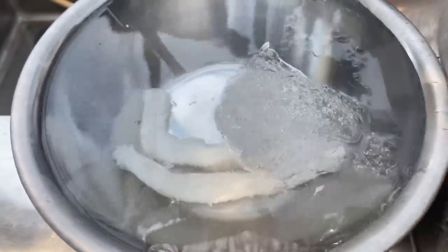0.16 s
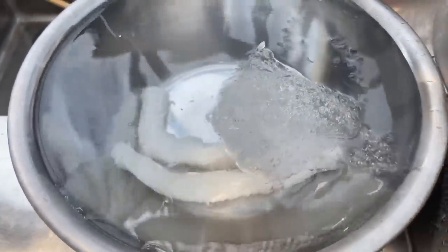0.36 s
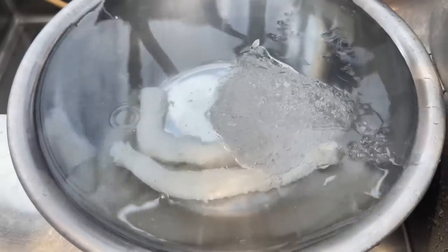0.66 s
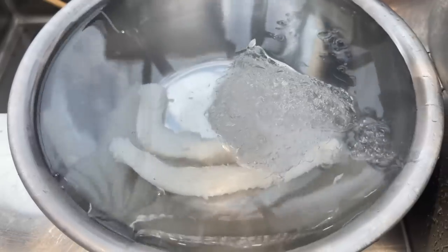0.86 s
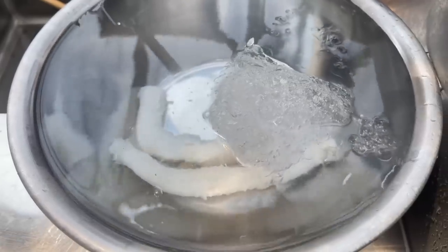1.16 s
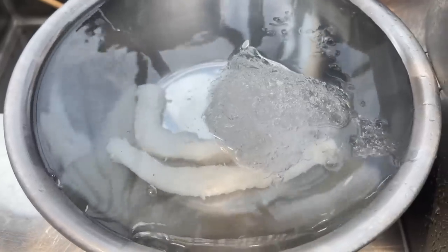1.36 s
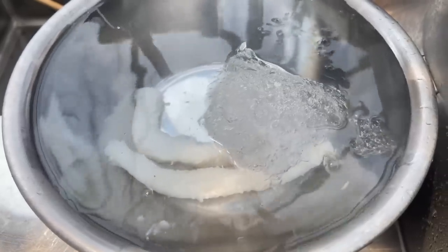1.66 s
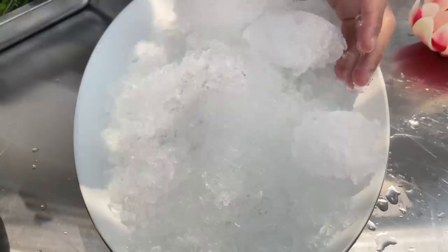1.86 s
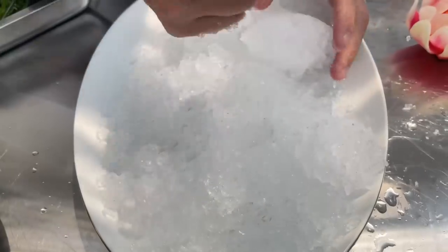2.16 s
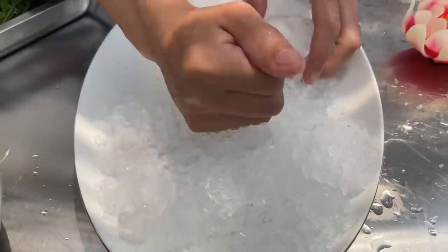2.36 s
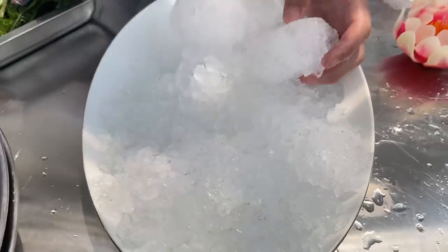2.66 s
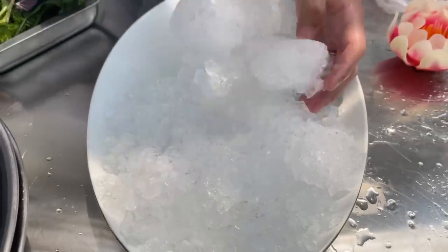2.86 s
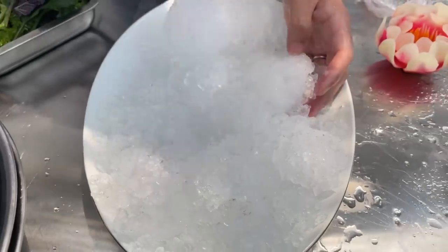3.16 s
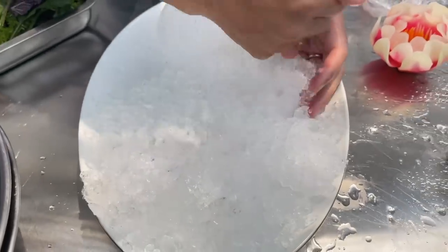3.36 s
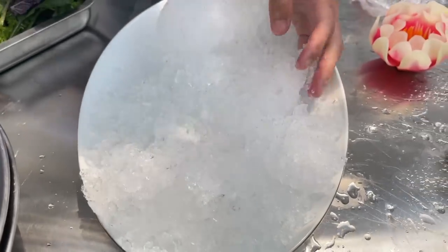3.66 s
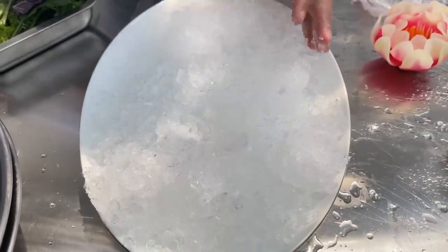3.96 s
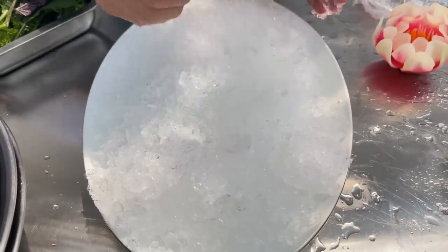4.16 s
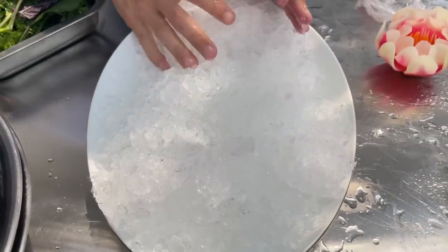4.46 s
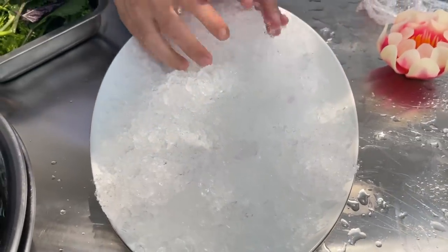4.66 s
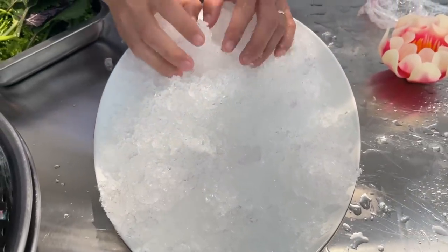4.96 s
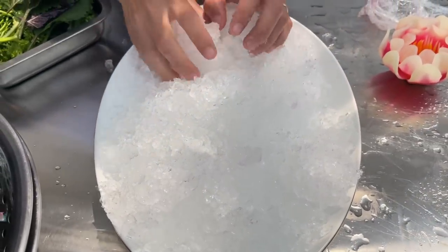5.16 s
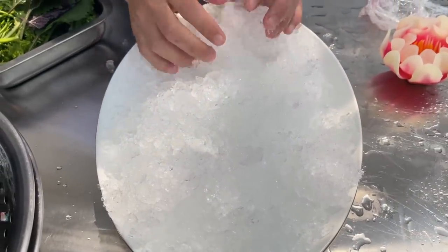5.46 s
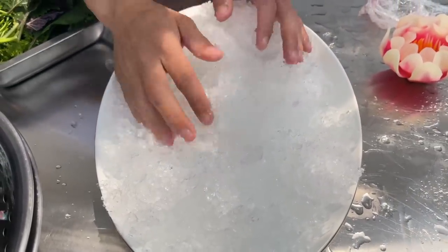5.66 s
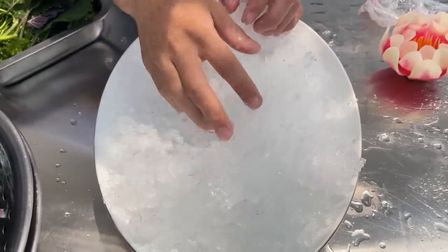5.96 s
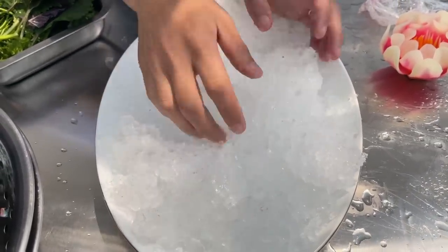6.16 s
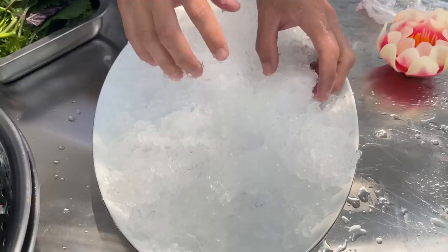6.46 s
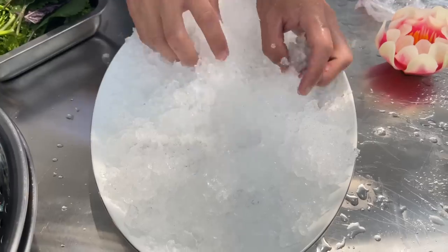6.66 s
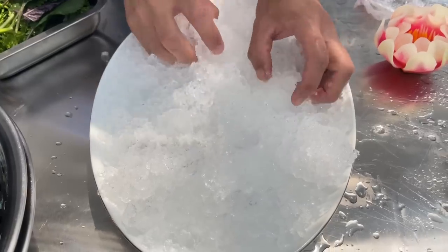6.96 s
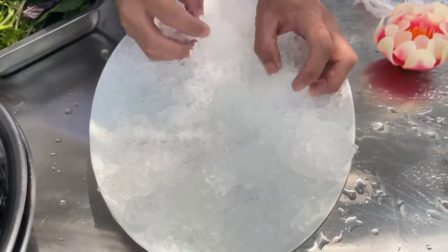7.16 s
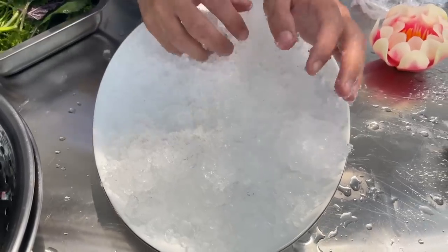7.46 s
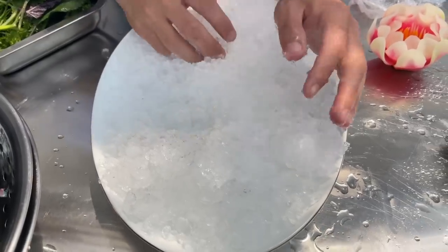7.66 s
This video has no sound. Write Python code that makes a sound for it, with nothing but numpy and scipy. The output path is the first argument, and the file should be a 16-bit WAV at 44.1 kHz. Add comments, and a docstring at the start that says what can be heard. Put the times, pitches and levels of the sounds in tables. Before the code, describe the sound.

After a quiet low water rush and a dull basin bump, crushed ice lands in crunchy bursts, then is pressed and spread with gritty crackles and clicks.

```python
"""Wet crushed ice on a steel counter

Handfuls of wet crushed ice land on a plate: bursts of tiny fractures, then a thud of the steel counter.
Fingers pat and spread the heap: grinding crystals, knocking lumps, snaps, clicks and a low hum of the push.
Dull bumps of basin and counter are filtered noise and pushes; water is a steady low rush of noise.
Faintly heard are puffs of hiss, thin wavering tones and a few far birds made of gliding, raspy tones.
A close pair of microphone ports hears it all."""
import sys
import numpy as np
from scipy import signal
from scipy.fft import rfft, irfft, next_fast_len
from scipy.io import wavfile
from scipy.ndimage import uniform_filter1d, map_coordinates

SR = 44100
rng = np.random.default_rng(int(sys.argv[2]) if len(sys.argv) > 2 else 0)


def transcribe(signal):
    """Save signal, clipped to [-1, 1], as a 16-bit WAV file at the path in sys.argv[1]."""
    frames = np.atleast_2d(signal).T
    limited = np.clip(frames, -1, 1)
    pcm = np.round(limited * 32767).astype(np.int16)
    wavfile.write(sys.argv[1], SR, pcm)


N = 344421  # length of the scene [samples]

# colour of the fine crystals' crackle: (frequency [Hz], level per Hz [dB])
FINE_SPECTRUM = [(1500, -11.5), (3000, -1), (4500, -5.5), (6500, -1.5), (8400, 6.5), (11200, 8),
                 (12200, -0.5), (13100, -16.5), (15600, -14)]


def amp(db):
    """Turn decibels into a plain factor."""
    return 10 ** (np.asarray(db) / 20)


def unit(x):
    """Scale a sound to an average (rms) strength of 1."""
    return x / np.sqrt(np.mean(x ** 2) + 1e-20)


def along(points, hz):
    """Read a curve of (frequency [Hz], value) points, with frequency on a log axis."""
    f, v = np.transpose(points)
    return np.interp(np.log(hz + 1), np.log(f + 1), v)


def seconds(size):
    """The time of each sample."""
    return np.arange(size) / SR


def wobble(rate, size=N):
    """A smooth random curve through `rate` random points a second."""
    points = rng.standard_normal(size // 40)
    return map_coordinates(points, [seconds(size) * rate], mode="mirror")


def filtered(x, response):
    """Change the strength and phase of each frequency by a (complex) response."""
    size = x.shape[-1]
    m = next_fast_len(size + SR // 10)  # spare room, so that endings do not wrap round
    hz = np.fft.rfftfreq(m, 1 / SR)
    return irfft(rfft(x, m) * response(hz), m)[..., :size]


def coloured(x, spectrum):
    """Shape a sound by a spectrum, then scale it to rms 1."""
    return unit(filtered(x, lambda hz: amp(along(spectrum, hz))))


def add(track, s, sound):
    """Mix a sound into the track from time s [s] on."""
    part = track[..., max(round(s * SR), 0):][..., :sound.shape[-1]]
    part += sound[..., :part.shape[-1]]


def swell(t, rise, t60, hold=0):
    """A smooth rise to 1, a hold, then a fall that takes t60 seconds to drop by 60 dB."""
    rising = np.sin(np.pi / 2 * np.minimum(t / rise, 1)) ** 2
    falling = amp(-60 * np.maximum(t - rise - hold, 0) / t60)
    return rising * falling


def grains(size, rate, spread_db):
    """Tiny fractures at random moments, on average `rate` a second, of unequal strength."""
    happens = rng.random(size) < rate / SR
    sign = rng.choice([-1, 1], size)
    strength = amp(spread_db * np.clip(rng.standard_normal(size), -2.5, 2.5))
    return happens * sign * strength


def echoes(x, t60s, size=SR // 2):
    """A diffuse tail of noise for each side; each frequency dies away at its own speed."""
    hz, t, z = signal.stft(rng.standard_normal((2, size)), SR, nperseg=256)
    fall = amp(-60 * t / along(t60s, hz)[:, None])
    tail = signal.istft(z * fall, SR, nperseg=256)[1]
    delayed = np.pad(x, (SR // 1000, 0))[None]  # the tail starts a millisecond late
    return signal.fftconvolve(delayed, tail / np.linalg.norm(tail[0]), axes=1)[:, :N]


def birds():
    """Far calls: tones whose pitch glides in an arch or a fall, made raspy by fast pitch flutter."""
    # (time [s], length [s], start [Hz], middle [Hz], end [Hz], flutter [share of pitch], level [dB])
    calls = [(0, .08, 2585, 2527, 2355, 0.123, -44), (3.447, 0.147, 3600, 3770, 3650, .065, -53.5),
             (5.933, 0.083, 3620, 3604, 3497, 0.02, -36), (6.113, 0.0806, 2150, 2695, 2510, 0.038, -35.5),
             (6.209, 0.096, 2480, 2318, 2060, 0.093, -39), (7.756, 0.11, 2750, 2720, 2700, 0.064, -43)]
    out, t = np.zeros(N), seconds(SR // 2)
    for s, length, start_hz, middle_hz, end_hz, rasp, db in calls:
        glide = np.interp(t / length, [0, .5, 1], [start_hz, middle_hz, end_hz])
        pitch = glide * (1 + rasp * wobble(700, len(t)))
        tone = np.sin(2 * np.pi * np.cumsum(pitch) / SR)
        add(out, s, amp(db) * swell(t, rise=0.0077, t60=0.33, hold=length - .03) * tone)
    return out


def rush():
    """A low rush of water: noise of slowly drifting level, nearly alike on both sides in the bass."""
    # (frequency [Hz], level per Hz [dB])
    rush_spectrum = [(22, -46), (35, 2.5), (55, -4.5), (110, 6), (160, 0), (250, -9.5), (500, -16),
                     (1000, -21), (2500, -31), (5000, -36.5), (8000, -43.5), (11500, -43), (13500, -84)]
    # (frequency [Hz], left-right likeness [1 = the same])
    likeness = [(100, 0.99), (300, 0.9), (700, 0.25), (5000, 0.14), (9000, 1)]

    def mid_and_side(hz):
        turn = np.arccos(np.clip(along(likeness, hz), -1, 1)) / 2
        return amp(along(rush_spectrum, hz)) * [np.cos(turn), np.sin(turn)]

    mid, side = filtered(rng.standard_normal((2, N)), mid_and_side)
    level = amp(-41.5 + 0.81 * wobble(3.14))
    return level * unit(np.array([mid + side, mid - side]))


def swishes():
    """Short soft puffs of hiss beside the basin: noise that swells and fades."""
    # (time [s], level [dB])
    puffs = [(0.201, -47.5), (.686, -45.5), (1.201, -48.5), (1.667, -48)]
    # (frequency [Hz], level per Hz [dB])
    hiss_spectrum = [(300, 4), (1700, 14), (3500, 11.5), (6000, 6), (8500, 5), (11200, 10.5), (12400, -4),
                     (13200, -42)]
    out, t = np.zeros(N), seconds(SR // 2)
    for s, db in puffs:
        hiss = coloured(rng.standard_normal(len(t)), hiss_spectrum)
        add(out, s, amp(db) * hiss * swell(t, rise=0.013, hold=0.074, t60=0.21))
    return out


def whine():
    """A few thin tones, slightly wavering in pitch and level, fade in and out together."""
    # (pitch [Hz], level [dB])
    thin_tones = [(1370, -64.5), (3170, -64.5), (3540, -64)]
    # (fade in starts [s], fade in ends [s], fade out starts [s], fade out ends [s])
    fade_times = (1.02, 1.13, 1.62, 1.85)
    tones = np.zeros(N)
    for hz, db in thin_tones:
        pitch = hz * (1 + 0.0112 * wobble(200))
        tones += amp(db + 1.4 * wobble(14.7)) * np.sin(2 * np.pi * np.cumsum(pitch) / SR)
    return tones * np.interp(seconds(N), fade_times, [0, 1, 1, 0])


def counter(force):
    """The steel counter answers a force by ringing at its own low pitches (modes)."""
    # (pitch [Hz], width [Hz], level [dB])
    modes = [(56, 21, 6), (77.2, 23.4, 7), (113, 33, 4.5), (142.6, 36, 3), (172.8, 15, 7), (238, 45, -3.5),
             (278.3, 27, 0.5), (359, 60, -8)]

    def response(f):
        total = 0
        for k, (pitch, width, db) in enumerate(modes):
            resonance = 1j * f * width / (pitch * pitch - f * f + 1j * f * width)
            total = total + (-1) ** k * amp(db) * resonance  # neighbours have opposite signs
        return total

    return filtered(force, response)


def contact(force, pitch_hz):
    """A springy contact passes mainly the band around its own pitch on to the counter."""
    width_hz = 0.55 * pitch_hz
    spring = lambda f: 1j * f / (pitch_hz ** 2 - f * f + 1j * f * width_hz)
    return unit(counter(filtered(force, spring)))


def blow(thud_db, knock_db, t60, thud_hz, hold=0):
    """A soft weight lands and settles: the counter thuds, with a short hollow knock on top."""
    # (frequency [Hz], level per Hz [dB])
    knock_spectrum = [(25, -40), (70, -13), (180, 5.5), (285, 1), (430, 1.5), (560, -4), (760, -4.5),
                      (950, -8.5), (1500, -17), (3000, -30), (10000, -84)]
    t = seconds(SR // 2)
    shape = swell(t, 0.0048, t60, hold)
    push = contact(t * np.exp(-t / 0.00022), thud_hz)
    settling = contact(shape * rng.standard_normal(len(t)), thud_hz)
    thud = unit(push + settling)
    knock = unit(shape * coloured(rng.standard_normal(len(t)), knock_spectrum))
    return (amp(thud_db) * thud + amp(knock_db) * knock) * np.sqrt(np.mean(shape ** 2))


def bumps():
    """Dull blows on basin and counter: a thud and a knock, with no crunch."""
    # (time [s], thud level [dB], thud pitch [Hz], knock level [dB])
    bump_list = [(1.228, -11, 194, -21.5), (1.281, -22, 82, -42), (1.371, -26.5, 109, -44),
                 (1.512, -20, 99, -46), (1.651, -28.5, 70, -44.5), (3.364, -23.5, 171, -39),
                 (4.51, -20, 93, -48), (5.94, -28, 144, -65), (6.473, -26.5, 160, -32.5),
                 (6.59, -20.5, 146, -28), (6.912, -24, 135, -42), (7.003, -43, 170, -25.5)]
    out = np.zeros(N)
    for s, thud_db, thud_hz, knock_db in bump_list:
        add(out, s, blow(thud_db, knock_db, 0.3, thud_hz))
    return out


def pressure():
    """How strongly each finger stroke drives crystals, lumps and push: it builds, holds and dies away."""
    # (time [s], length [s], fine crystals [dB], coarse lumps [dB], push on the plate [dB])
    strokes = [ (1.787, 0.13, -35, -46, -60), (2.055, 0.19, -34.5, -45, -51),
               (2.16, 0.2, -33.5, -39.5, -49.5), (2.474, 0.11, -38.5, -42.5, -48),
               (2.687, 0.076, -40.5, -52, -59), (2.776, 0.082, -32.5, -46.5, -71),
               (3.083, 0.043, -43.5, -44.5, -44.5), (3.552, 0.062, -47, -57, -50),
               (3.891, 0.061, -27.5, -30.5, -27), (3.985, 0.045, -36.5, -37, -38),
               (4.092, 0.066, -54, -53, -46), (4.249, 0.074, -33, -43, -44),
               (4.518, 0.1, -32.5, -36.5, -33), (4.677, 0.098, -35.5, -40, -40),
               (4.798, 0.088, -37.5, -44.5, -45.5), (4.93, 0.096, -42, -49, -53),
               (5.007, .14, -32.5, -40, -48.5), (5.177, .05, -37.5, -46.5, -55),
               (5.224, 0.066, -37.5, -43.5, -49.5), (5.317, 0.11, -35, -40, -46.5),
               (5.655, 0.03, -20.5, -31.5, -48), (5.724, 0.013, -24, -33.5, -38.5),
               (5.834, 0.076, -48, -55, -42), (5.898, 0.1, -25, -35, -39), (6.222, 0.095, -33, -42.5, -66),
               (6.381, 0.072, -36, -42.5, -43.5), (6.444, 0.063, -38, -45, -33.5),
               (6.485, 0.13, -28, -37, -31), (6.641, 0.15, -39, -45.5, -43.5),
               (6.769, 0.16, -32, -37.5, -38), (6.899, .07, -43.5, -42.5, -35.5),
               (6.981, 0.047, -36, -39, -26.5), (7.05, 0.22, -46.5, -51, -46.5),
               (7.247, 0.066, -40.5, -42.5, -36), (7.356, 0.12, -29.5, -49, -37),
               (7.439, 0.066, -38, -37, -34.5), (7.519, 0.061, -38.5, -42, -38.5),
               (7.603, 0.071, -35.5, -47, -53)]
    out, t = np.zeros((3, N)), seconds(SR)
    for s, length, *levels_db in strokes:
        rise = 0.59 * length  # the rest of the stroke holds
        shape = swell(t, rise, t60=0.3, hold=length - rise)
        add(out, s, np.outer(amp(levels_db), shape) ** 2)  # overlapping strokes add as power
    return np.sqrt(out)


def lumps(size, rate, pitch_hz):
    """Bigger pieces knock together: random fractures coloured around a pitch set by their size."""
    # (frequency [multiple of the lump pitch], level per Hz [dB])
    lump_spectrum = [(.15, -33), (.35, -15.5), (.6, 0.5), (1, 2), (1.45, 2.5), (2, -5.5), (3, -11),
                     (6, -20)]
    spectrum = [(multiple * pitch_hz, db) for multiple, db in lump_spectrum]
    return coloured(grains(size, rate, spread_db=2.5), spectrum)


def patchy(x, depth_db):
    """Ever-new pieces touch, so the colour shifts at random from moment to moment."""
    z = signal.stft(x, nperseg=512)[2]
    field = uniform_filter1d(rng.standard_normal(z.shape), size=5, axis=0)  # smooth over frequency
    field = uniform_filter1d(field, size=7, axis=1)  # smooth over time
    return unit(signal.istft(z * amp(depth_db * unit(field)), nperseg=512)[1][:len(x)])


def fingers():
    """Crystals grind in stick-slip clumps, lumps rub the plate or snap, and the push hums in the counter."""
    # a lump snapping: (frequency [Hz], level per Hz [dB])
    snap_spectrum = [(500, -18), (1200, 0.5), (3000, 1), (6000, -12), (11000, -17), (13500, -24)]
    # ice pushed over the plate: (frequency [Hz], level per Hz [dB])
    rub_spectrum = [(30, -45), (90, -2), (150, -1.5), (285, 3), (430, -0.5), (600, -7), (950, -6),
                    (1400, -10), (3000, -53), (10000, -80)]
    # (heap starts to grow [s], heap is full [s])
    heap_times = (3.3, 4.5)
    fine, coarse, push = pressure()
    # the loose heap keeps crackling, more as it grows
    settling = amp(-44.5) * np.interp(seconds(N), heap_times, [0, 1])
    # one break sets off its neighbours: small avalanches stand out of the grinding
    breaks = np.abs(grains(N, 40, spread_db=2))
    avalanches = signal.fftconvolve(breaks, swell(seconds(SR // 20), .001, .03))[:N]
    slip = unit(amp(1.1 * wobble(60)) * (1 + .8 * avalanches))

    crystals = patchy(coloured(grains(N, 4800, spread_db=-1.5), FINE_SPECTRUM), depth_db=0.5)
    knocking = patchy(lumps(N, 1900, pitch_hz=1954), depth_db=1.5)
    snaps = coloured(grains(N, 70, spread_db=1), snap_spectrum)
    rubbing = coloured(grains(N, 1400, spread_db=5), rub_spectrum)
    hum = contact(rng.standard_normal(N), pitch_hz=159)

    out = np.hypot(fine, settling) * slip * crystals
    out += coarse * slip * knocking
    out += amp(-12) * coarse * snaps
    out += push * slip * rubbing
    return out + amp(-2) * push * hum


def clicks():
    """A hard piece snaps: a very short crack of noise makes it ring for a few cycles."""
    # (time [s], peak level [dB], pitch [Hz], width [Hz])
    hard_pieces = [(1.895, -3.5, 2460, 890), (2.14, -16.5, 10500, 5000), (2.164, -7, 7540, 8550),
                   (2.19, -21.5, 673, 34.2), (2.299, -12.5, 4900, 2220), (2.357, -10.5, 11000, 4000),
                   (4.112, -20.5, 11500, 5900), (4.442, -4.5, 3000, 6000), (5.53, -23.5, 2750, 2500),
                   (5.605, -23.5, 9300, 6000)]
    out, t = np.zeros(N), seconds(SR // 8)
    for s, db, hz, width_hz in hard_pieces:
        crack = swell(t, rise=.0008, t60=.007) * rng.standard_normal(len(t))
        body = lambda f: (1j * f + 0.37 * hz) / (hz * hz - f * f + 1j * f * width_hz)
        dulling = lambda f: amp(along([(11000, -2), (13500, -13)], f))
        snap = filtered(crack, lambda f: dulling(f) * body(f))
        add(out, s - .001, amp(db) * snap / np.abs(snap).max())  # starts 1 ms before the listed time
    return out


def crush(rise, t60, coarse_db, fine_db, hold=0, lump_hz=2000):
    """A clump collapses in a dense burst of fractures, both lumps and fine crystals."""
    t = seconds(SR // 2)
    fine = coloured(grains(len(t), 7000, spread_db=3.5), FINE_SPECTRUM)
    coarse = lumps(len(t), 4000, lump_hz)
    return swell(t, rise, t60, hold) * (amp(coarse_db) * coarse + amp(fine_db) * fine)


def handfuls():
    """Each handful crushes first; its weight reaches the plate a moment later and thuds."""
    # (time [s], overall level [dB], coarse level [dB], lump pitch [Hz], fine level [dB], knock level [dB],
    #  thud level [dB], thud pitch [Hz], rise [s], hold [s], time for the crush to fall by 60 dB [s])
    landings = [ (1.903, -20, -2.5, 1300, -0.5, -6, 0, 128, 0.0083, 0.0025, .02),
                (2.02, -14.5, -6, 1920, -0.5, -25, -10.5, 86, 0.0041, 0.014, 0.13),
                (2.381, -20, -4.5, 1840, 4, -24.5, -1.5, 100, 0.011, 0.011, 0.16),
                (2.961, -18, -1.5, 2040, 5, -15, -6.5, 91, 0.0065, 0.0055, .11),
                (3.301, -14, -1.5, 2160, 0.5, -15.5, -6.5, 74, 0.0087, 0.0049, 0.07),
                (3.77, -12, -5, 1880, -1.5, -5, -2, 103, 0.008, 0.00086, 0.17),
                (4.434, -20, -7, 1320, -1.5, 2, 6.5, 282, .007, .027, 0.5)]
    thud_lag_s, thud_t60_s = 0.00197, 0.21  # delay after the crush has risen; time to fall by 60 dB
    out = np.zeros(N)
    for (s, db, coarse_db, lump_hz, fine_db, knock_db,
         thud_db, thud_hz, rise, hold, t60) in landings:
        add(out, s, amp(db) * crush(rise, t60, coarse_db, fine_db, hold, lump_hz))
        weight = blow(thud_db, knock_db, thud_t60_s, thud_hz, hold)
        add(out, s + rise + thud_lag_s, amp(db) * weight)
    return out


def crunches():
    """Now and then a clump gives way at once under a finger: a sudden burst of fractures."""
    # (time [s], overall level [dB], coarse level [dB], time to fall by 60 dB [s])
    clumps = [(2.185, -15, -14.5, 0.12), (2.298, -16, -26, 0.024), (2.231, -33, -2, 0.027),
              (2.262, -23, -15, .04), (2.331, -27.5, -6, 0.068), (3.905, -33, 5, 0.078),
              (4.243, -25, -11.5, 0.078), (4.712, -25, -12, 0.21), (4.924, -25, -10.5, .13),
              (5.646, -24, -21, 0.084), (5.929, -31, -1, 0.22), (6.192, -24, -14.5, 0.19),
              (6.776, -26.5, -17, .05), (6.837, -41, 4, 0.066), (6.881, -30, 3.5, 0.053),
              (7.004, -48, 4, .08), (7.279, -50, 0, 0.089), (7.407, -30.5, -22, 0.3),
              (7.589, -29.5, -2.5, 0.1)]
    out = np.zeros(N)
    for s, db, coarse_db, t60 in clumps:
        add(out, s, amp(db) * crush(.0035, t60, coarse_db, fine_db=-3))
    return out


def scatter(x, count=5):
    """The spot that sounds keeps moving, so reflections off the steel drift between several patterns."""
    # (frequency [Hz], level [dB])
    steel_colour = [(100, -31.5), (300, -5), (600, -5), (2000, -3), (5800, -4), (8500, -6.5), (15000, -58)]
    shares = np.array([wobble(25) for _ in range(count)])
    shares /= np.linalg.norm(shares, axis=0)
    fall_times = [(200, 0.074), (8000, 0.029)]  # (frequency [Hz], time to fall by 60 dB [s])
    reflections = sum(echoes(share * x, fall_times, size=SR // 10) for share in shares)
    return filtered(reflections, lambda hz: amp(along(steel_colour, hz)))


def scene():
    """Close ice with its reflections, far sounds with their echo, and the rush under both."""
    # (frequency [Hz], left minus right level [dB])
    left_lean = [(70, 2), (170, -2.5), (500, 0.5), (1000, 1.5), (2500, 3), (5500, 3), (8500, 1),
                 (12000, -0.5)]
    # (frequency [Hz], time for the room's echo to fall by 60 dB [s])
    room_fall = [(150, 0.11), (1500, 0.51), (10000, 0.3)]
    calls, water = birds(), rush()
    faint = swishes() + whine()
    ice = bumps() + fingers() + clicks() + handfuls() + crunches()
    close = filtered(ice + scatter(ice), lambda hz: amp(np.outer([1, -1], along(left_lean, hz)) / 2))
    far_fall = [(1500, 0.3), (4000, 0.64), (10000, 0.27)]  # (frequency [Hz], time to fall by 60 dB [s])
    outside = calls + faint + echoes(amp(0.5) * calls + amp(-4) * faint, far_fall)
    return amp(-1) * close + amp(-17.0) * echoes(ice, room_fall) + outside + water


def record(dry):
    """The two ports differ in phase and lose the deepest bass; high peaks are rounded, then the band ends."""
    # (frequency [Hz], phase by which the left port leads [radians])
    port_phase = [(100, 0), (800, .7), (1800, .1), (3100, 1.1), (4200, .8), (6500, .1), (7000, .25),
                  (7500, .9), (8600, 0), (9000, -.7), (9800, -2.8), (10300, -3.2), (11000, -4.4),
                  (11900, -6.28), (13000, -6.45), (13200, -9.42), (14300, -9.42), (14550, -12.57)]
    cut_hz, top_hz = 38, 15900  # bass fades below the first; nothing is left above the second

    def ports(hz):
        ratio = cut_hz / (hz + 1)
        low_cut = 1 / (1 - 1j * ratio - ratio ** 2) ** 2
        return low_cut * np.exp(1j * np.outer([1, -1], along(port_phase, hz)) / 2)

    pair = filtered(dry, ports)
    rounded = pair / (1 + np.abs(pair / .95) ** 6) ** (1 / 6)
    return filtered(rounded, lambda hz: np.clip((top_hz - hz) / 250, 0, 1))


dry = scene()
out = record(dry)
transcribe(out)
```